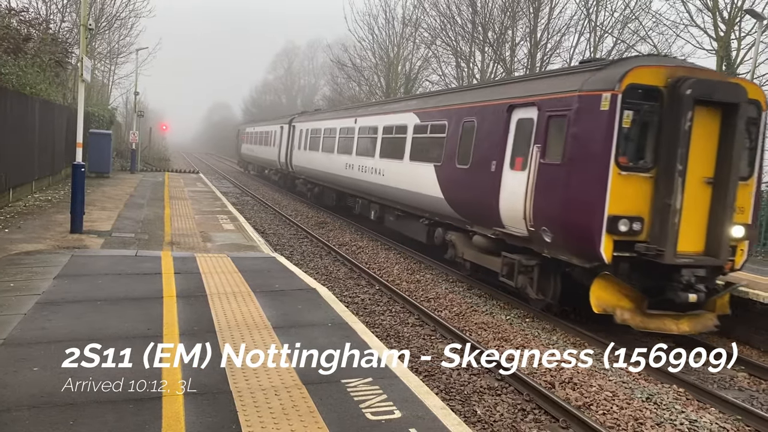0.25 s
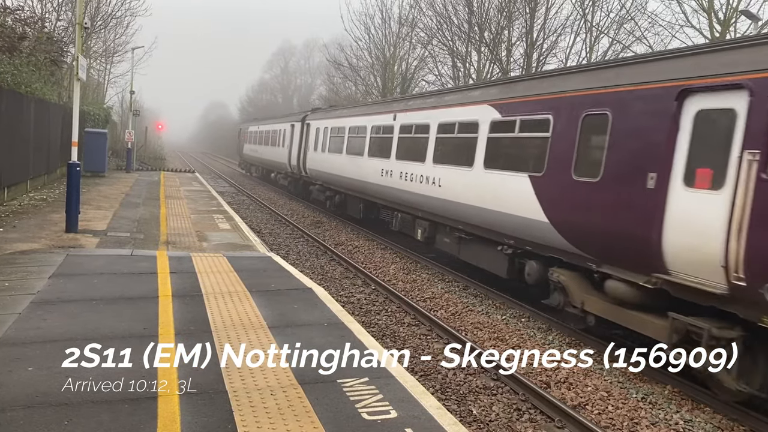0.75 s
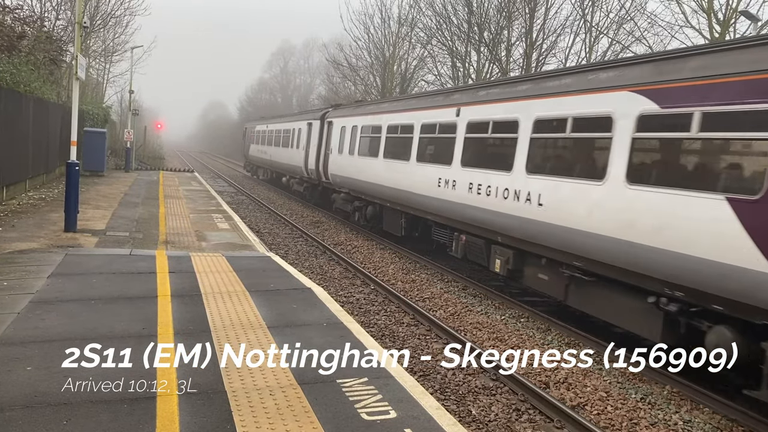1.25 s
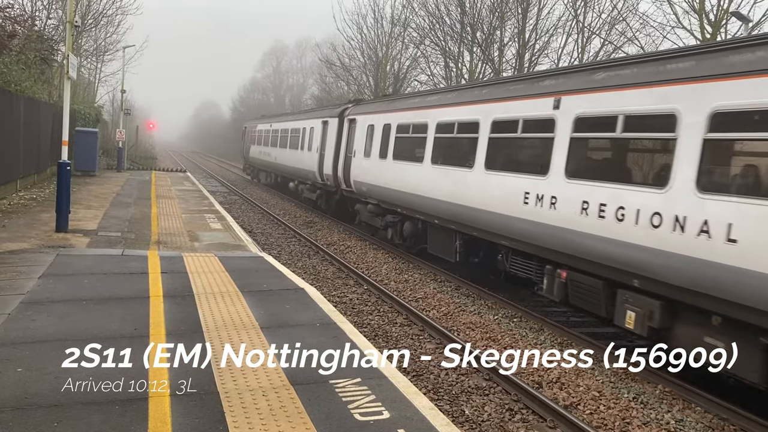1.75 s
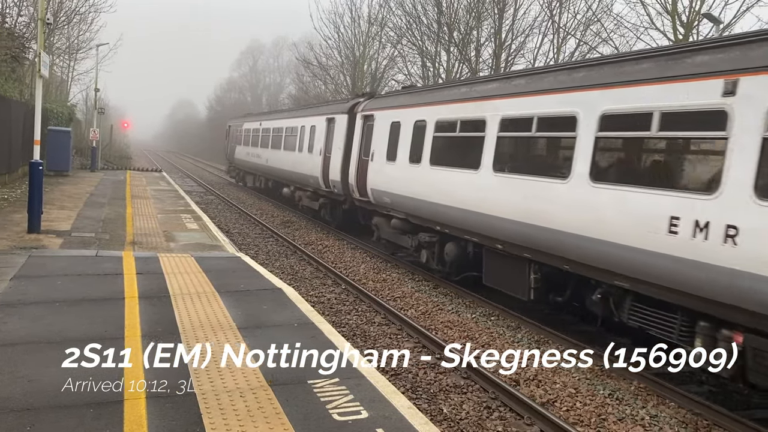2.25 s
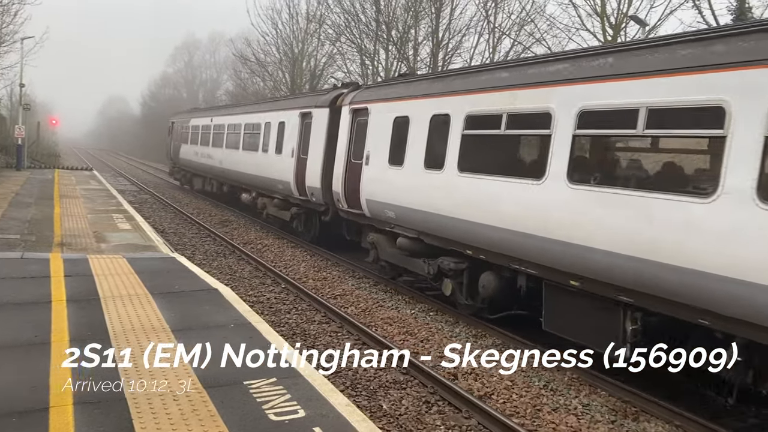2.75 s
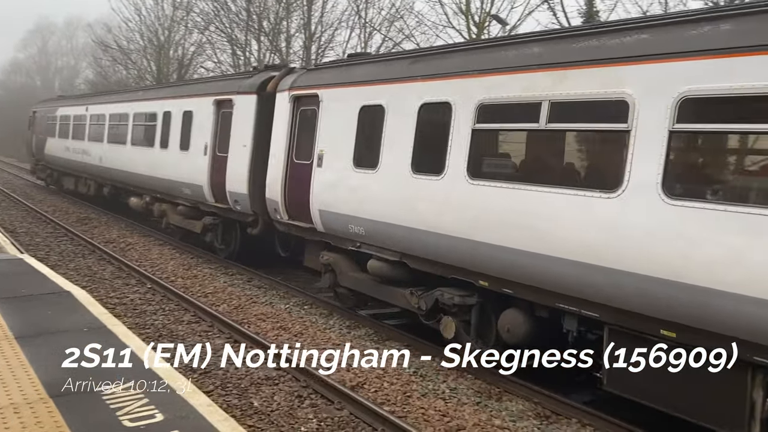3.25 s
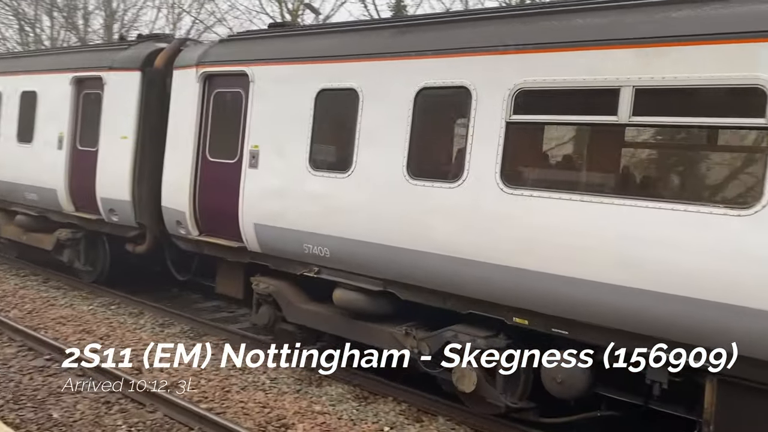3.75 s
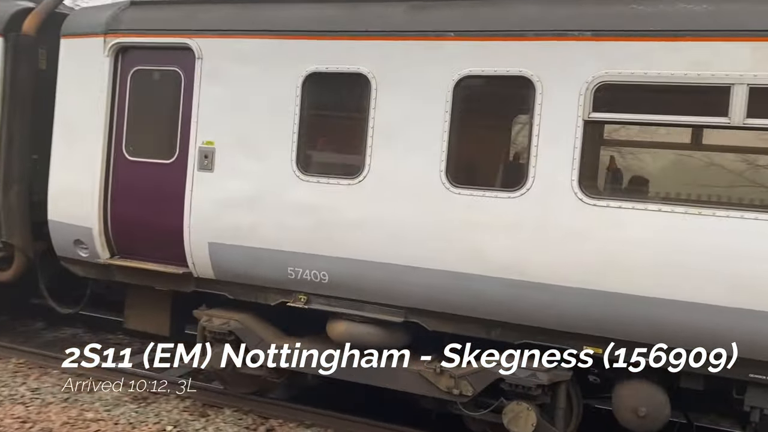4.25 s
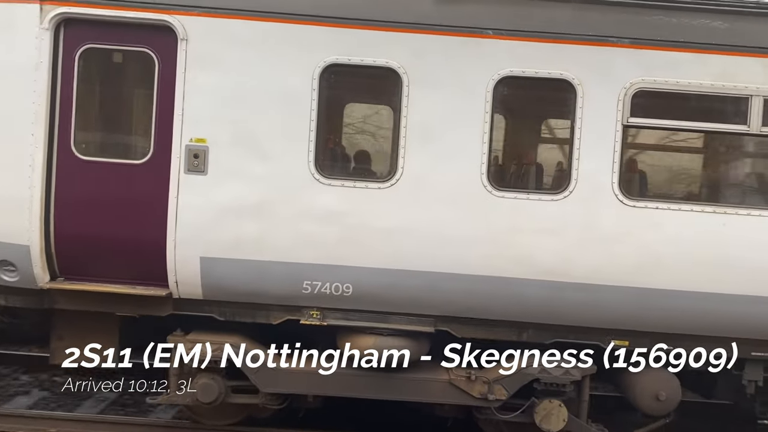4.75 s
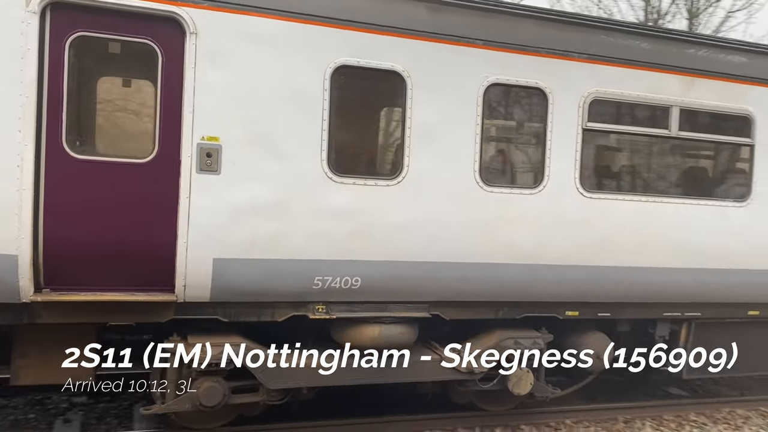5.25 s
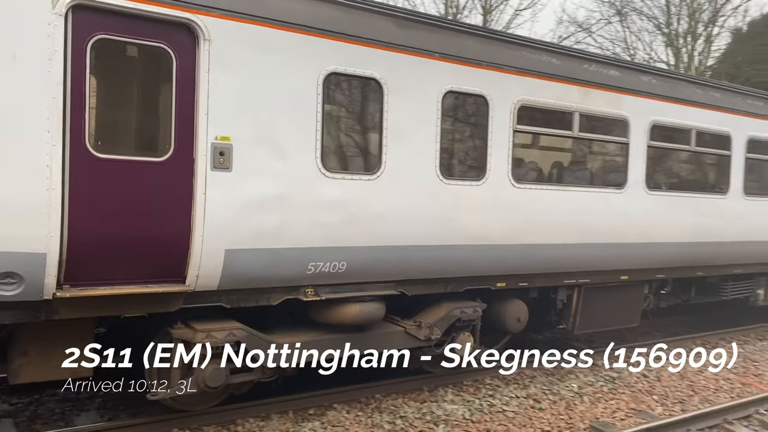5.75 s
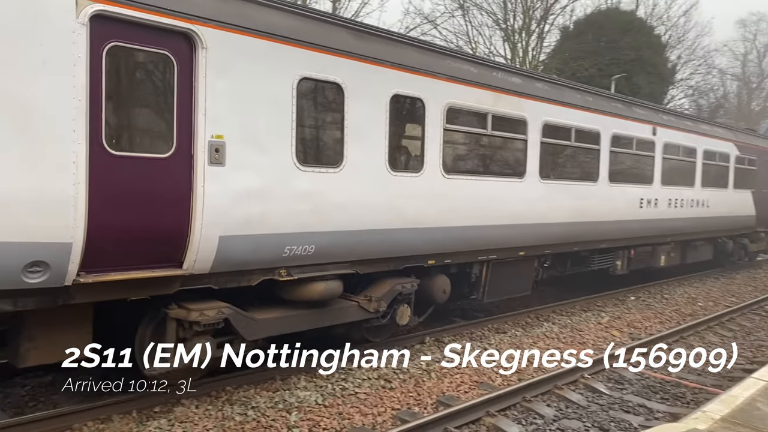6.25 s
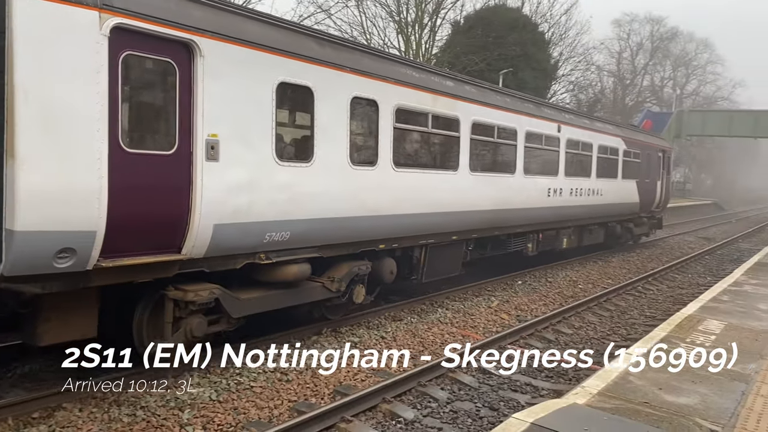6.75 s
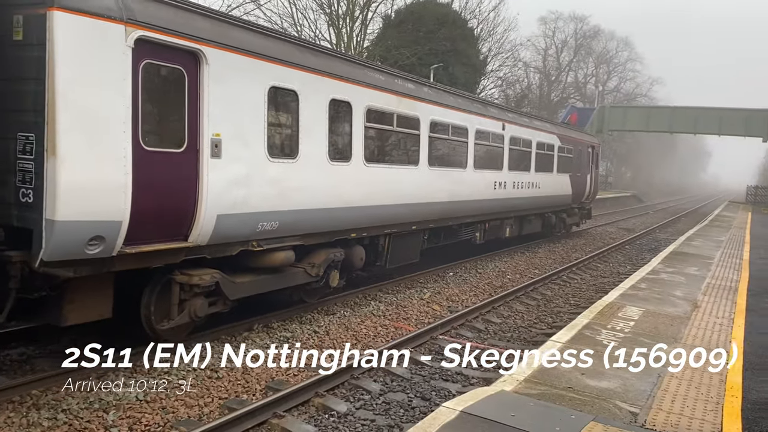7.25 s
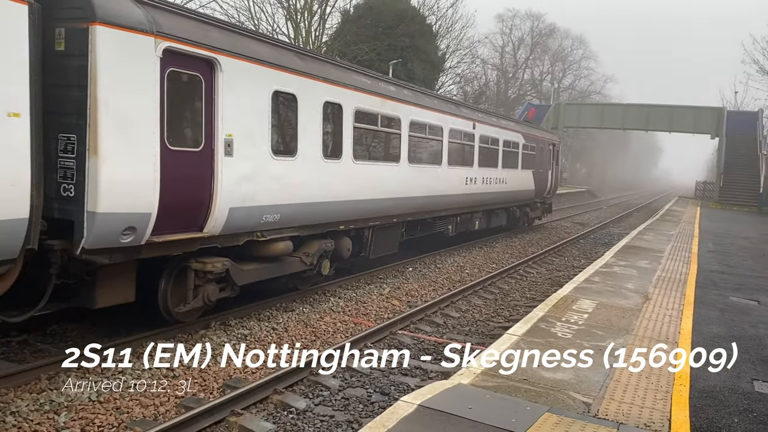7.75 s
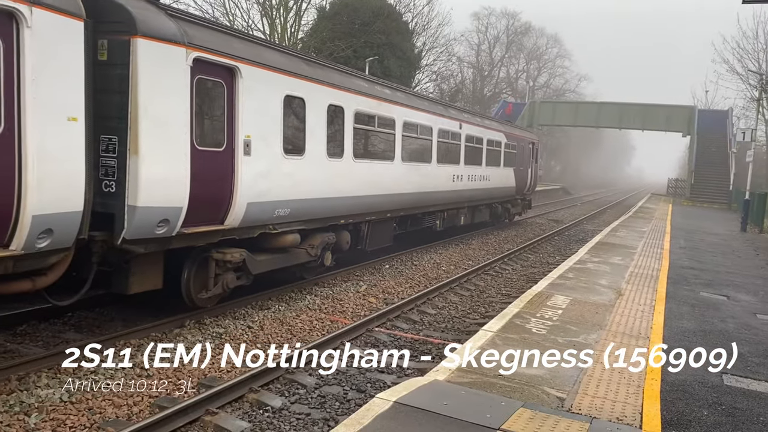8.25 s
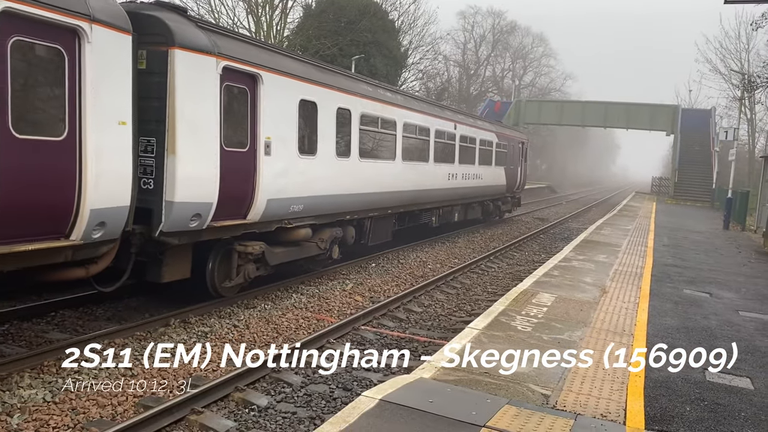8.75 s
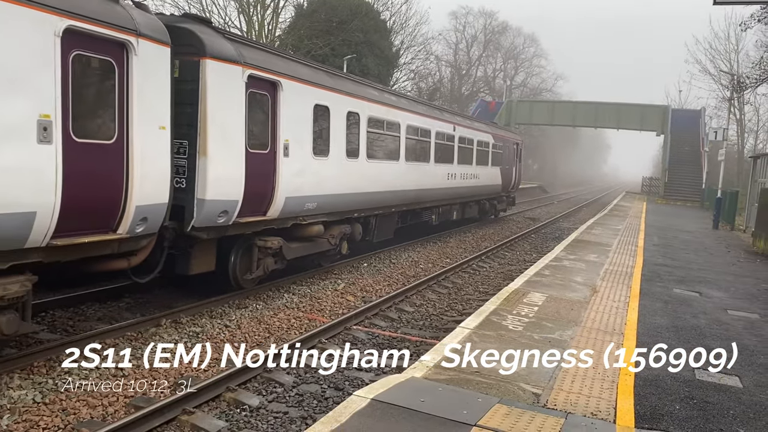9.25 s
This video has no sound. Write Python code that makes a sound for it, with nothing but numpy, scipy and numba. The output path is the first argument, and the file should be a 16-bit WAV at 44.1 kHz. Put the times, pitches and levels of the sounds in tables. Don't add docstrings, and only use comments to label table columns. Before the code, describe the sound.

Heavy rolling roar and wheel booms pass close by, thin brake squeals chatter midway, then the rumble fades under a beating low engine idle.

```python
import sys
import numpy as np
from scipy import signal
from scipy.fft import rfft, irfft, next_fast_len
from scipy.io import wavfile
from scipy.ndimage import uniform_filter1d
from numba import njit

SR = 44100
rng = np.random.default_rng(int(sys.argv[2]) if len(sys.argv) > 2 else 0)


def volts(x):
    e = np.asarray(x, float) / 20
    return 10 ** e


def log_audio(samples):
    frames = np.atleast_2d(samples).T
    limited = np.clip(frames, -1, 1)
    pcm = np.round(limited * 32767).astype(np.int16)
    wavfile.write(sys.argv[1], SR, pcm)


N = 418950
SIZE = next_fast_len(N)
FREQ = np.arange(SIZE // 2 + 1) * SR / SIZE
T = np.arange(N) / SR

# (time [s], rolling level [dB], rubbing level of the brake blocks [dB])
ROLLING = [(0, -19.5, -36.5), (.25, -18, -37.5), (.7, -17.5, -35), (1.6, -18, -34), (2.5, -18, -36),
           (3.6, -17.5, -34.5), (4.25, -18.5, -33), (4.6, -18.5, -34), (5.3, -20.5, -34.5),
           (5.9, -21, -35.5), (6.5, -24, -36.5), (7.2, -26, -37.5), (8.1, -27, -37), (8.8, -26.5, -35.5),
           (9.5, -26.5, -36)]
# (time [s], rumble centre [Hz], share of the slow-speed colour [0-1])
SLOWING = [
    (0, 112, 0),
    (.7, 94, 0),
    (2, 92, .1),
    (3.2, 84, .15),
    (4.5, 80, .22),
    (5.8, 78, .42),
    (7, 80, .95),
    (9.5, 80, 1),
]
# (level over rolling at speed [dB], level near the stop [dB], flicker [dB])
ROLLING_LAYERS = [(-7, -0.5, -1), (-2, -7, -0.36), (-8, -2.5, 0.6)]
# (frequency [Hz], density [dB per Hz])
FAST_COLOUR = [(120, 0), (200, -9), (350, -8), (560, -8), (700, -8.5), (1000, -8.5), (1400, -13),
               (1750, -17.5), (2300, -16), (3000, -18), (3500, -17.5), (4500, -20.5), (5500, -19.5),
               (7500, -32.5)]
# (frequency [Hz], density [dB per Hz])
SLOW_COLOUR = [(120, 0), (200, -7.5), (350, -12.5), (600, -7), (800, -11), (1100, -13.5), (1500, -16),
               (1900, -18), (2500, -15.5), (3050, -18), (3400, -21.5), (4400, -20.5), (5300, -24.5),
               (7500, -37.5)]
# (frequency [Hz], width [Hz], gain [dB])
WHEEL_MODES = [(202, 29, 4.5), (299, 39, 5.5), (356, 48, 4.5), (448, 27, 4), (538, 47, 3.5),
               (1880, 78, 3.5)]
# (frequency [Hz], width [Hz], gain [dB])
CASING_MODES = [(287, 88, 6.5), (436, 42, 6.5), (563, 29, 1), (671, 10.6, 9), (797, 69, 4), (898, 24, 6),
                (1386, 170, 3), (2756, 140, 5.5), (3015, 47, 9.5), (4540, 450, 2.5)]
# (time [s], length [s], level [dB], frequency [Hz])
BALLAST_THUDS = [(.05, 0.057, -20, 111), (.37, 0.054, -19, 105), (.7, .07, -21, 96), (.86, .08, -19.5, 88),
                 (1.06, 0.048, -25, 88.8), (1.3, 0.064, -21, 95.5), (1.55, .06, -25, 90.3),
                 (1.68, .04, -27, 104.3), (2.05, .07, -21, 111), (2.3, .07, -27, 96.3),
                 (2.5, 0.093, -23, 92.6), (2.75, .06, -28, 93.7), (3.05, .1, -20.5, 92.2),
                 (3.4, .08, -28, 72.3), (3.99, .05, -24, 85), (4.42, .05, -23, 85),
                 (4.25, 0.062, -26, 129.4), (4.65, .05, -26, 71.7), (5.7, 0.0497, -26, 80.2),
                 (5.78, 0.036, -26, 72), (5.88, .06, -23, 87.4), (6.35, 0.083, -28, 81.7),
                 (.02, .03, -31, 1000), (.03, .03, -40, 1290), (.2, 0.037, -32, 1140), (8.8, .1, -31, 820),
                 (8.52, 0.058, -33, 640), (1.1, .08, -29, 560), (.1, 0.1, -27.5, 390),
                 (1.8, .08, -27.5, 210), (8.13, 0.069, -32, 660), (7.33, .05, -32, 693)]
# (time [s], length [s], level [dB], frequency [Hz])
AXLE_BOOMS = [(.33, .07, -27.5, 345), (.55, .07, -20.5, 360), (.66, .05, -21, 330), (.82, .04, -21.5, 380),
              (.92, 0.048, -20.5, 360), (1.12, .05, -18, 330), (1.21, 0.056, -20, 345),
              (1.2, .05, -21.5, 283), (1.35, .07, -22, 310), (1.35, .08, -21.5, 465),
              (1.68, 0.0463, -23.5, 345), (1.88, .08, -23, 275), (2.0, 0.091, -24, 350),
              (2.5, 0.08, -30, 350), (2.65, .05, -24, 320), (2.8, .07, -25, 395), (3.04, .05, -24.5, 520),
              (3.35, .07, -25, 315), (3.58, .08, -25.5, 318), (3.78, 0.047, -21.5, 325),
              (3.97, 0.057, -25.5, 325), (4.2, 0.091, -26, 150), (4.6, 0.075, -32, 78),
              (.25, .07, -26, 465), (.45, .05, -25.5, 550), (4.1, .05, -21, 340), (4.36, .04, -33, 350),
              (9.14, 0.029, -28, 660), (9.34, 0.042, -27, 700)]
# (time [s], exhaust level [dB], clatter level [dB])
ENGINE_LEVELS = [(0, -51, -47), (2, -43, -62), (3.5, -38, -45), (4.8, -33, -49), (4.9, -23.5, -46),
                 (5.6, -25, -52), (5.9, -28, -50), (6.2, -26, -48), (6.5, -25, -45.5), (6.72, -38, -49.5),
                 (7.0, -28, -51), (7.4, -30, -50), (8, -28.5, -49), (8.4, -31, -48), (8.8, -28.5, -47),
                 (9.1, -30, -47), (9.5, -29, -47)]
# (multiple of the cycle [1], level [dB])
EXHAUST_ORDERS = [
    [(4, -30), (6, -16), (12, -6), (18, -17)],
    [(6, -24), (8, -14), (12, -1.5), (48, -23)],
]
# (time [s], beats of the twelfth multiple so far [1])
ENGINE_BEATS = [(0, -15), (4.92, 0), (5.23, 1), (5.53, 2), (5.86, 3), (6.16, 4), (6.5, 5), (7.0, 6),
                (7.41, 7), (7.75, 8), (9.08, 12), (9.47, 13), (9.6, 13.3)]
# (level [dB], ..)
CYLINDER_LEVELS = (-3.5, -11, -6.5, -9, -9, -6)
# (frequency [Hz], gain [dB])
CLATTER_COLOUR = [(1000, -35), (2200, 4), (3000, 9), (5000, 5.5), (7000, -32), (11000, -9.0), (16500, -62)]
# (frequency [Hz], density [dB per Hz])
HISS_COLOUR = [(4000, -24), (6000, -1), (8500, -1), (10000, -5), (12000, -6.5), (14000, -8), (16500, -10)]
# (time [s], length [s], level [dB])
AIR_PUFFS = [
    (0.952, 0.56, -53.5),
    (4.08, 0.43, -49.5),
    (4.6, 0.58, -56),
    (5.367, 0.65, -50),
    (8.6, .08, -57),
]
# (time [s], length [s], level [dB])
SQUEALS = [(3.632, .02, -28), (3.67, .04, -30), (3.745, .02, -26.5), (3.782, .025, -25),
           (3.82, .035, -22.5), (3.862, .045, -26), (3.91, .03, -34), (3.985, .05, -35), (4.035, .06, -26),
           (4.132, .04, -26), (4.185, .012, -29), (4.238, .03, -27.5), (4.295, .015, -27),
           (4.318, .045, -28), (4.38, .035, -30), (4.435, .02, -34), (4.49, .16, -38), (4.745, .045, -31.5),
           (4.82, .09, -34), (4.93, .04, -38), (4.67, .06, -41)]
# (frequency [Hz], width [Hz], level [dB])
SQUEAL_SIDE_MODES = [(930, 18, 0), (3740, 90, -5), (4720, 90, -5), (2700, 40, -3), (2860, 40, -3)]
# (time [s], length [s], level [dB], frequency [Hz])
TREAD_CATCHES = [(3.715, .015, -37, 2830), (3.77, .015, -33, 2790), (3.85, .02, -37, 2680),
                 (3.89, .02, -37, 2830), (4.025, .012, -33, 2860), (4.065, .015, -35, 2880),
                 (4.115, .012, -34, 2780), (4.145, .015, -32, 2830), (4.19, .015, -35, 2760),
                 (4.23, .01, -35, 2800), (4.305, .015, -33, 2880), (4.31, .02, -33, 2700),
                 (4.345, .015, -34, 2860), (4.39, .018, -32, 2860), (4.4, .025, -35, 2690),
                 (4.46, .022, -32, 2710), (4.03, .02, -40, 3750), (4.07, .02, -39, 3800),
                 (4.17, .02, -38, 3820), (4.13, .02, -41, 4750), (4.18, .025, -42, 4720),
                 (4.24, .025, -41, 4680), (4.03, .015, -41, 4420), (4.14, .015, -41, 4300),
                 (4.36, .02, -42, 4750), (3.8, .04, -43, 3720), (4.16, .03, -37, 2080),
                 (4.35, .03, -37, 2700)]
# (time [s], length [s], level [dB], frequency [Hz])
GEAR_SQUEAKS = [(4.045, .02, -32, 1130), (4.56, .015, -36, 1150), (4.62, .025, -33, 1150),
                (4.685, .035, -33, 1150), (4.765, .03, -37, 1150), (4.775, .035, -36, 920),
                (4.69, .015, -36, 950), (4.845, .015, -35, 920), (4.89, .02, -36, 920),
                (4.985, .035, -35, 880), (5.07, .012, -34, 890), (5.02, .03, -43, 1420),
                (4.93, .02, -41, 4380), (4.965, .025, -41, 4500), (5.005, .015, -42, 4400),
                (4.655, .015, -45, 4400), (4.675, .012, -43, 4580), (4.79, .025, -42, 3700),
                (4.54, .015, -43, 3650), (4.98, .05, -43, 3520), (5.01, .03, -42, 2710),
                (4.52, .025, -57, 13400), (5.18, .025, -54, 13400), (8.622, .015, -33, 3560),
                (8.63, .015, -35, 2980), (8.69, .03, -39, 1800), (8.2, .012, -39, 2600),
                (8.305, .015, -38, 2850), (8.39, .008, -37, 2800), (8.46, .01, -38, 2700),
                (8.6, .012, -37, 2400), (8.635, .03, -28, 515), (8.72, .03, -36, 560),
                (8.9, .012, -40, 2980), (8.955, .012, -39, 2960), (9.15, .012, -38, 2940),
                (9.47, .01, -40, 4300), (9.4, .05, -47, 4150), (4.95, .04, -48, 5200)]
# (frequency [Hz], gain [dB])
SQUEAK_GAIN = [(1200, 4), (2200, -1.5), (3500, -3)]
# (time [s], level [dB], frequency [Hz])
RIGGING_KNOCKS = [(8.184, -9, 640), (8.385, -11, 580), (5.72, -12, 500), (5.8, -12, 500), (8.622, -15, 560),
                  (8.71, -19, 600)]
# (frequency [Hz], width [Hz], level [dB])
GROAN_MODES = [(511, 10, -5), (598, 10, -3), (740, 30, -17), (1190, 200, -8), (1800, 40, -14),
               (2150, 60, -17), (2450, 40, -18), (2630, 40, -17), (3000, 2200, -9), (3580, 80, -17),
               (4300, 900, -13)]
# (level [dB], ..)
GRAB_LEVELS = (-26, -41, -44, -47, -47, -46, -50, -48)
# (time [s], share from behind [0-1], share from ahead [0-1]); the rest faces the train
PHONE_TURN = [
    (0, 0, 0),
    (.9, 0, 0),
    (1.4, 1, 0),
    (3.2, 1, 0),
    (3.7, 0, 0),
    (5.2, 0, 0),
    (5.7, 0, 1),
    (9.5, 0, 1),
]
# (frequency [Hz], likeness [0-1], left lag [rad])
FACING_PORTS = [(60, .98, 0), (170, .9, -.1), (450, .68, -.1), (750, .3, 1.8), (1000, .55, 1.6),
                (1300, .6, .3), (1700, .5, 2), (1950, .55, 1.3)]
# (frequency [Hz], likeness [0-1], left lag [rad])
BEHIND_PORTS = [(60, .96, 0), (170, .86, .25), (450, .58, .9), (700, .4, 1.8), (900, .5, 2.2),
                (1300, .3, 2), (1600, .35, 3), (1950, .1, 0)]
# (frequency [Hz], likeness [0-1], left lag [rad])
AHEAD_PORTS = [(60, .98, 0), (170, .82, -.3), (400, .55, -1), (600, .62, -1.9), (800, .62, -2.6),
               (1300, .4, -2.8), (1650, .62, 2.8), (1950, .55, 1.3)]
# (frequency [Hz], likeness [0-1], left lag [rad])
SHARED_PORTS = [(2400, .77, 0), (3000, .6, -1.3), (3350, .3, -1.6), (3650, .35, .4), (4300, .65, 0),
                (5050, .4, -1.4), (5500, .3, 2.8), (5850, .35, 1.2), (6300, .52, -.2), (7000, .65, 0),
                (8200, .7, 0), (9000, .95, 0), (16000, .92, 0)]
# (frequency [Hz], left minus right [dB])
SHADE_FAST = [(150, -0.7), (400, -1), (700, 1), (1200, -0.5), (1800, 1.5), (4500, 1.2), (6500, 0.5)]
# (frequency [Hz], left minus right [dB])
SHADE_CRAWL = [(150, -0.5), (300, 1), (520, 5.5), (1000, 2.5), (1500, -0.5), (2500, -2), (4500, 0),
               (6500, -2)]


def curve(table):
    s, *columns = np.transpose(table)
    return [np.interp(T, s, column) for column in columns]


def shape(points):
    hz, value = np.transpose(points)
    return np.interp(np.log(FREQ + 1), np.log(hz), value)


def unit(x):
    return x / np.sqrt(np.mean(x ** 2))


def filtered(x, gain):
    return irfft(rfft(x, SIZE) * gain, SIZE)[..., :N]


def band(lo_hz, hi_hz):
    return 1 / np.sqrt((1 + (lo_hz / (FREQ + 1)) ** 8) * (1 + (FREQ / hi_hz) ** 8))


def noise():
    return rng.standard_normal((3, N))


def walk(rate):
    hold = int(SR / rate)
    steps = np.repeat(rng.standard_normal(N // hold + 1), hold)
    return 1.266 * uniform_filter1d(uniform_filter1d(steps, hold), hold)[:N]


@njit
def svf(x, hz, damping):
    y, band_state, low_state = np.empty(len(x)), 0., 0.
    for i in range(len(x)):
        g = np.tan(np.pi * hz[i] / SR)
        v = (band_state + g * (x[i] - low_state)) / (1 + g * (g + damping))
        band_state = 2 * v - band_state
        low_state += 2 * g * v
        y[i] = damping * v
    return y


def ringing(modes):
    return 1 + sum((volts(db) - 1) / (1 + (2 * (FREQ - hz) / width) ** 2) for hz, width, db in modes)


def tone(hz, wobble, rate):
    return np.sqrt(2) * np.sin(2 * np.pi * np.cumsum(hz * (1 + wobble * walk(rate))) / SR)


def rough(hz, width_hz):
    return unit(svf(rng.standard_normal(N), np.full(N, 1. * hz), width_hz / hz))


def burst(s, hold, rise, fall):
    return np.clip((T - s) / rise, 0, 1) * np.exp(-np.maximum(T - s - hold, 0) / fall)


def dabs(table, wobble, rate, flutter_db):
    out, tremble = np.zeros(N), walk(rate)
    for s, length, db, hz in table:
        near = np.abs(T - s) < 3 * length
        swell = np.exp(-((T[near] - s) / length) ** 2)
        phase = 2 * np.pi * hz * np.cumsum(1 + wobble * tremble[near]) / SR
        out[near] += volts(db) * swell * np.sqrt(2) * np.sin(phase)
    return out * volts(flutter_db * walk(rate))


def rolling():
    rolling_db, rubbing_db = curve(ROLLING)
    hz, slow = curve(SLOWING)
    rumble_db, roar_db, ring_db = (rolling_db + fast + slow * (crawl - fast) + flicker * walk(8.3)
                                   for fast, crawl, flicker in ROLLING_LAYERS)
    grind_db = rubbing_db + 1 + .45 * walk(7.6)
    hz = hz * (1 + 0.032 * walk(1.9))
    rumble = [svf(row, hz, 0.16) + .5 * svf(svf(row, 0.88 * hz, 0.48), hz, 1.0) for row in noise()]
    out = unit(np.array(rumble)) * volts(rumble_db - 3 * slow ** 2)
    fast_wave = rfft(noise(), SIZE) * volts(shape(FAST_COLOUR)) * ringing(WHEEL_MODES)
    slow_wave = rfft(noise(), SIZE) * volts(shape(SLOW_COLOUR)) * ringing(CASING_MODES)
    bands = band(125, 450), band(450, 1600), band(1600, 8000)
    for db, edges in zip((roar_db, ring_db, grind_db), bands):
        fast, crawl = (unit(irfft(wave * edges, SIZE)[:, :N]) for wave in (fast_wave, slow_wave))
        out += (np.sqrt(1 - slow) * fast + np.sqrt(slow) * crawl) * volts(db)
    return out


def ground():
    shake = unit(filtered(rng.standard_normal(N), band(24, 56)))
    return shake * volts(curve(ROLLING)[0] - 16.5 + 4 * curve(SLOWING)[1] + 1.2 * walk(1.5))


def thuds():
    return dabs(BALLAST_THUDS, 0.032, 20, 1.2)


def booms():
    return dabs(AXLE_BOOMS, 0.0337, 30, 1.1)


def engines():
    cycle_hz, loud_firing_s = 6.083, 8.15
    exhaust_db, clatter_db = curve(ENGINE_LEVELS)
    cycles = cycle_hz * (T - loud_firing_s)
    lag = uniform_filter1d(curve(ENGINE_BEATS)[0], size=4000) / 12
    exhaust = 0
    for turns, orders in zip((cycles, cycles - lag), EXHAUST_ORDERS):
        for multiple, db in orders:
            exhaust = exhaust + volts(db) * np.sqrt(2) * np.cos(2 * np.pi * multiple * turns)
    firing = np.floor(6 * cycles).astype(int)
    since = (6 * cycles - firing) / (6 * cycle_hz)
    cylinder_db = np.array(CYLINDER_LEVELS)[firing % 6]
    scatter_db = 1.6 * rng.standard_normal(firing.max() - firing.min() + 1)[firing - firing.min()]
    gate = volts(cylinder_db + scatter_db) * np.exp(-since / 0.021) * np.minimum(since / 0.0037, 1)
    clatter = filtered(noise() * gate, volts(shape(CLATTER_COLOUR)))
    tick_gate = volts(1.3 * cylinder_db + scatter_db) * np.exp(-since / .001)
    ticks = filtered(noise() * tick_gate, band(10000, 17000))
    mechanical = unit(clatter) + volts(-21) * unit(ticks)
    return exhaust * volts(exhaust_db + 0.25 * walk(3.3)) + mechanical * volts(clatter_db)


def air():
    leak_db, rise_s, fall_s = -32.5, .04, 0.16
    hiss = unit(filtered(noise(), volts(shape(HISS_COLOUR))))
    puffs = sum((volts(db) * burst(s, hold, rise_s, fall_s)) ** 2 for s, hold, db in AIR_PUFFS)
    flow = np.sqrt(volts(curve(ROLLING)[1] + leak_db) ** 2 + puffs)
    return hiss * flow * volts(.5 * walk(22.5) + 0.74 * walk(36))


def squeal():
    squeal_hz, grip_s, slip_s, side_db = 1871, .01, .012, -16
    faint_link = (3.62, 1.3, -45)
    main = sum(volts(db) * burst(s, hold, grip_s, slip_s) for s, hold, db in SQUEALS + [faint_link])
    mode = .86 * tone(squeal_hz, .006, 80) + .25 * rough(squeal_hz, 90)
    out = main * volts(1.5 * walk(140)) * mode
    side = sum(volts(db + side_db + 1.5 * walk(70)) * rough(hz, width) for hz, width, db in SQUEAL_SIDE_MODES)
    return out + main * side + volts(-.5) * dabs(TREAD_CATCHES, .009, 150, 2)


def brakes():
    groan_s, grab_hz = 8.6, 597
    squeaks = filtered(dabs(GEAR_SQUEAKS, .016, 150, 2.5), volts(shape(SQUEAK_GAIN)))
    knocks = sum(volts(db) * burst(s, 0, 0.00069, .0025) * np.sin(2 * np.pi * hz * (T - s))
                 for s, db, hz in RIGGING_KNOCKS)
    groan = filtered(sum(volts(db) * rough(hz, width) for hz, width, db in GROAN_MODES), band(400, 4500))
    groan = groan * volts(-24 + 1.0 * walk(58)) * burst(groan_s, .04, .02, .1)
    slips = np.cumsum(grab_hz * (1 + 0.01 * walk(60))) / SR
    grab = sum(volts(db) * np.sqrt(2) * np.sin(2 * np.pi * multiple * slips)
               for multiple, db in enumerate(GRAB_LEVELS, 1))
    return squeaks + knocks + groan + grab * burst(groan_s, .05, .02, .012)


def ports(common, scatter, table):
    zero_hz, turn_hz = 7000, 4150
    hz, like, turn = np.transpose(table + SHARED_PORTS)
    link = np.interp(np.log(FREQ + 1), np.log(hz), like * np.exp(-1j * turn))
    link = link * np.exp(-2j * np.pi * np.maximum(FREQ - zero_hz, 0) / turn_hz)
    share = np.abs(link) + 1e-9
    shared = common + scatter[0] * np.sqrt(share)
    phases = np.array([link / share, np.ones(len(FREQ))])
    return irfft(shared * phases + scatter[1:] * np.sqrt(1 - share), SIZE)[:, :N]


def scene():
    field = rfft(rolling() + engines() + air(), SIZE)
    direct = rfft(ground() + thuds() + booms() + squeal() + brakes(), SIZE)
    behind, ahead = curve(PHONE_TURN)
    heard = (1 - behind - ahead) * ports(direct, field, FACING_PORTS)
    heard += behind * ports(direct, field, BEHIND_PORTS)
    heard += ahead * ports(direct, field, AHEAD_PORTS)
    slow = curve(SLOWING)[1]
    side = np.array([[.5], [-.5]])
    at_speed = filtered(heard, volts(side * shape(SHADE_FAST)))
    near_stop = filtered(heard, volts(side * shape(SHADE_CRAWL)))
    return (1 - slow) * at_speed + slow * near_stop


def roll_off(x):
    return signal.sosfilt(signal.butter(12, 17040, fs=SR, output="sos"), x)


def record(dry):
    treble_hz, treble_db, top_hz = 7800, 8, 15770
    treble = 1 / (1 + (treble_hz / (FREQ + 1)) ** 10)
    lift = np.sqrt(1 - treble + treble * volts(2 * treble_db))
    mix = filtered(dry, band(43.0, SR) * (FREQ < top_hz) * lift)
    return roll_off(mix)


dry = scene()
out = record(dry)
log_audio(out)
```